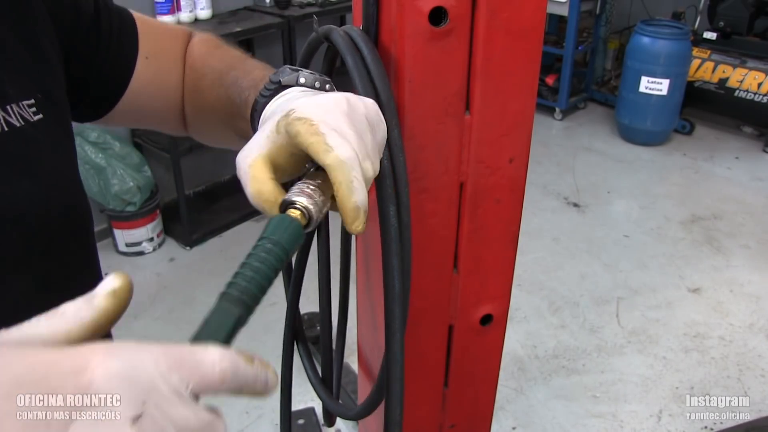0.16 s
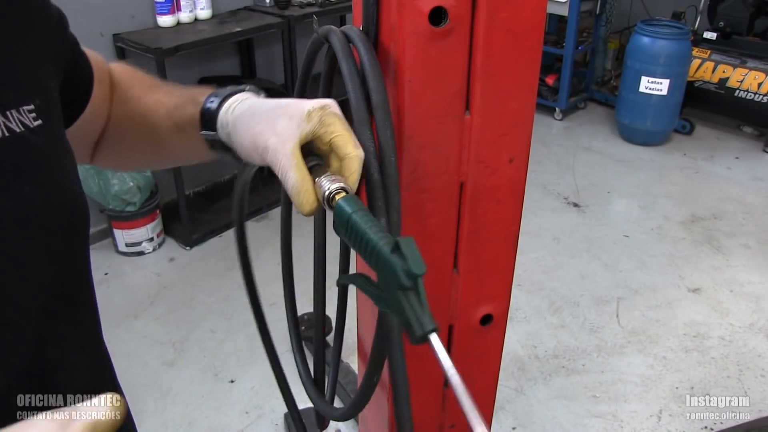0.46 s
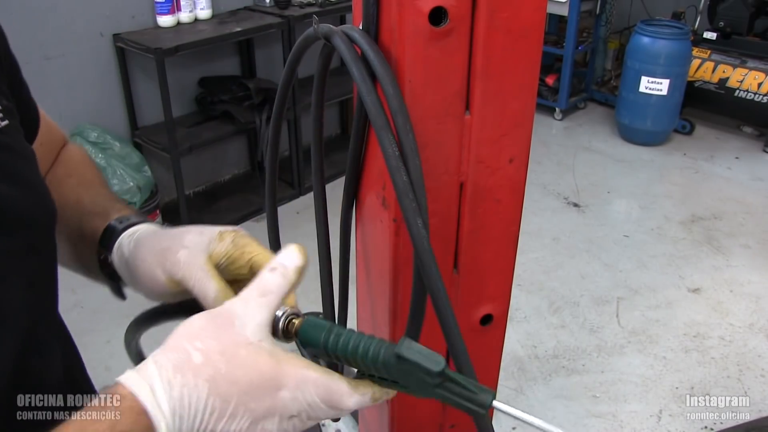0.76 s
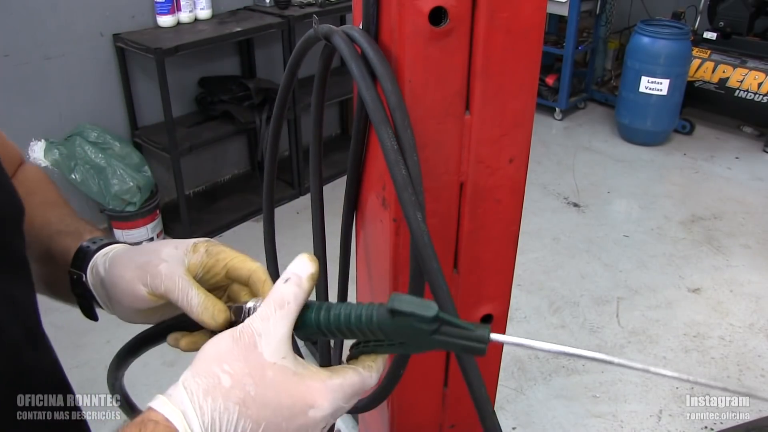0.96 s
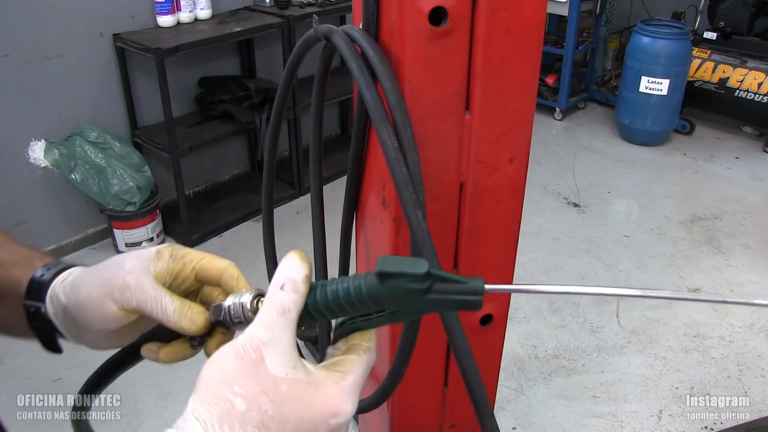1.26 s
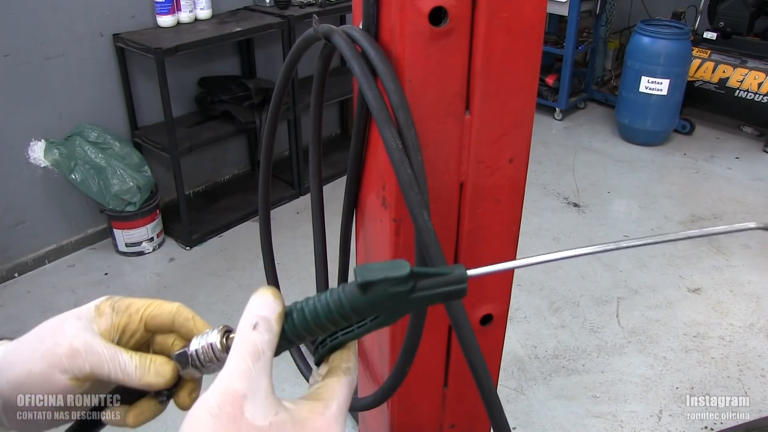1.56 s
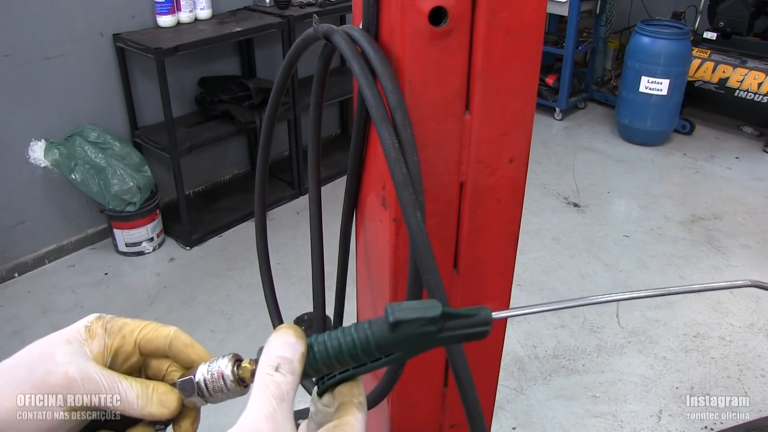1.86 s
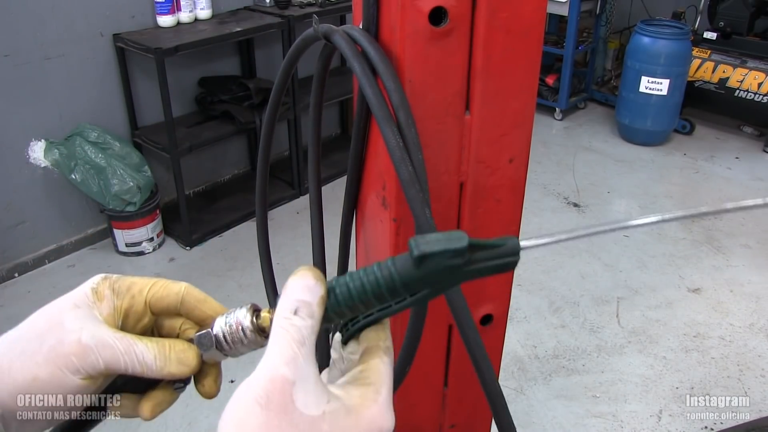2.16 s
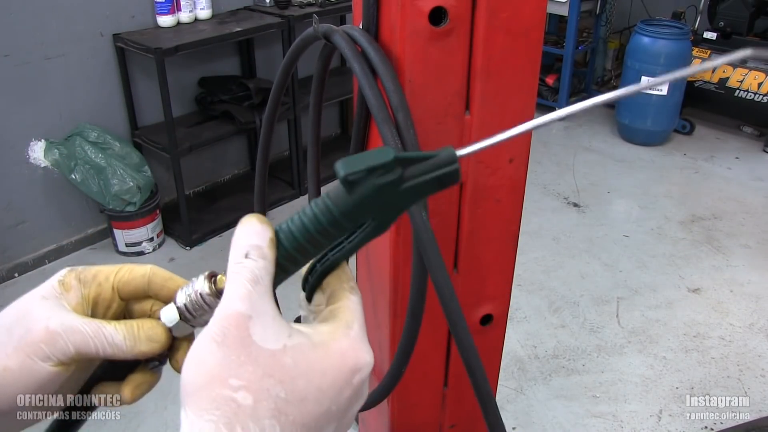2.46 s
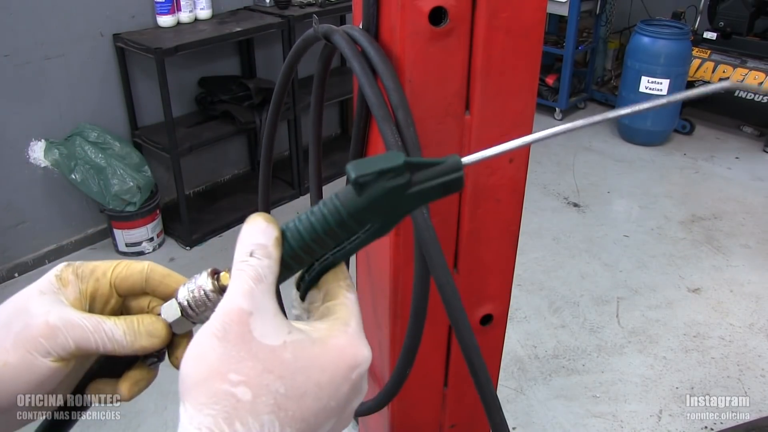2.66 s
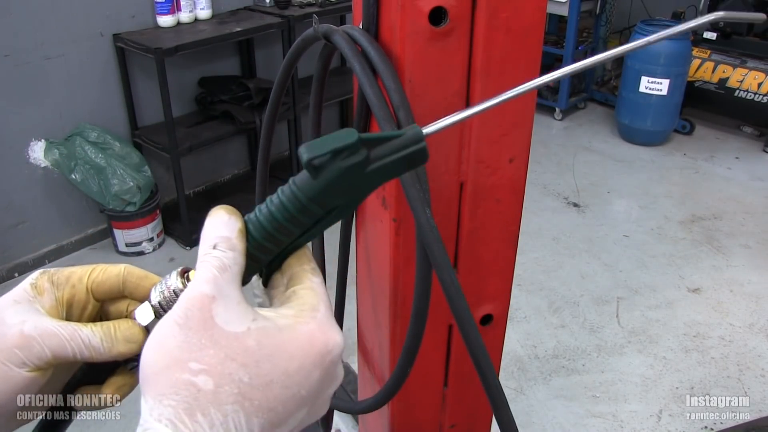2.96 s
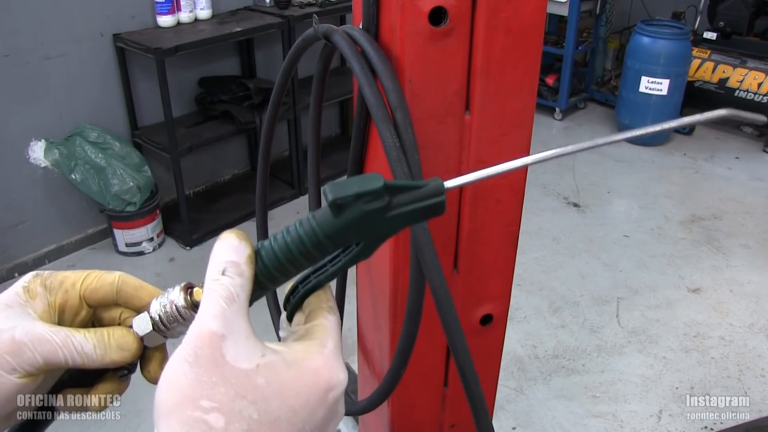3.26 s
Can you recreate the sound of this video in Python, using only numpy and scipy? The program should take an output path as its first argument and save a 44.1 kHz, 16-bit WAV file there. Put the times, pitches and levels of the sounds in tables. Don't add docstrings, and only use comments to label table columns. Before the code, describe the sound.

Air gun blasts, close and very loud, follow a second of tiny metal clicks and faint scrapes. Five hissing squeezes with dull trigger knocks echo in a big hard hall, the recorder's level ducking under each.

```python
import sys
import numpy as np
from scipy import signal
from scipy.fft import rfft, irfft
from scipy.io import wavfile
from scipy.ndimage import uniform_filter1d

SR = 44100
rng = np.random.default_rng(int(sys.argv[2]) if len(sys.argv) > 2 else 0)


def volts_from_db(level):
    exponent = np.asarray(level, float) / 20
    return 10 ** exponent


def master(y):
    cut = np.clip(np.atleast_2d(y).T, -1, 1)
    pcm = np.round(cut * 32767)
    wavfile.write(sys.argv[1], SR, pcm.astype(np.int16))


N = 149940


def evened(x):
    return x / np.sqrt(np.mean(x ** 2) + 1e-20)


def add(mix, start_s, sound):
    part = mix[round(start_s * SR):][:len(sound)]
    part += sound[:len(part)]


def read(points, hz):
    f, value = np.transpose(points)
    return np.interp(np.log(hz + 1), np.log(f + 1), value)


def colour(x, table):
    gain = volts_from_db(read(table, np.fft.rfftfreq(x.shape[-1], 1 / SR)))
    return irfft(rfft(x) * gain, x.shape[-1])


def resonate(x, hz, width_hz):
    turn = np.exp(2j * np.pi * np.cumsum(hz * np.ones(len(x))) / SR)
    r = np.exp(-np.pi * width_hz / SR)
    return 2 * (turn * signal.lfilter([1 - r], [1, -r], x / turn)).real


def wander(size):
    return evened(uniform_filter1d(uniform_filter1d(rng.standard_normal(N), size), size))


# pitch_hz, likeness [0-1]
LIKENESS = [(60, 0.91), (180, 0.87), (550, 0.73), (1650, 0.54), (4970, 0.57), (15000, 0.76)]


def diffuse(level_db):
    frames, hz = N // 128 + 5, np.fft.rfftfreq(512, 1 / SR)
    a, b, c, d = rng.standard_normal((frames, 257, 4)).T
    same = np.clip(read(LIKENESS, hz), 0, 1)[:, None]
    left = a + 1j * b
    right = same * left + np.sqrt(1 - same ** 2) * (c + 1j * d)
    level = volts_from_db(level_db(hz[:, None], np.arange(frames) * 128 / SR))
    spectra = np.array([left, right]) * level
    return signal.istft(spectra, nperseg=512, noverlap=384)[1][:, :N]


# pitch_hz, slope-free level_db
JET_COLOUR = [(150, -55), (650, -21), (1400, -17), (2500, -14.5), (6000, -10), (8500, -8), (11300, -4.5),
              (16000, -4.5)]


def jet_hiss():
    crackling = rng.standard_normal(N) * volts_from_db(1 * wander(size=12))
    return evened(colour(crackling, JET_COLOUR)) * volts_from_db(1.22 * wander(size=250))


def tube_whoosh(raw, u):
    low_hz, high_hz, fill_s = 1670, 6500, 0.077
    hz = low_hz + (high_hz - low_hz) * np.clip(u / fill_s, 0, 1)
    return evened(resonate(raw, hz, width_hz=1900)) * volts_from_db(-15.5)


def tip_whistle(raw, start_s):
    fade_db_per_s = -7.5
    return evened(resonate(raw, 11260, width_hz=4350)) * volts_from_db(-5 + fade_db_per_s * (start_s - 1))


# start_s, length_s, level_db, sag_db_per_s
SQUEEZES = [
    (1.108, 0.095, 0, -65),
    (1.342, .1, -1.5, -18),
    (1.977, 0.1278, 4, 5),
    (2.348, 0.14, 5, -12),
    (2.691, 0.43, 6, -24),
]


def jets():
    leak_s, leak_db, open_s, close_s = 0.016, -21, 0.029, 0.047
    out, hiss, raw = np.zeros(N), jet_hiss(), rng.standard_normal(N)
    for start_s, length_s, level_db, sag_db_per_s in SQUEEZES:
        u = np.arange(-leak_s, length_s + close_s, 1 / SR)
        first = round((start_s - leak_s) * SR)
        at = slice(first, first + len(u))
        opening = np.clip(u / open_s, 0, 1)
        closing = np.clip((length_s - u) / close_s + 0.5, 0, 1)
        flow = opening * closing * volts_from_db(sag_db_per_s * u)
        leak = volts_from_db(leak_db) * (u < open_s) * np.clip(u / leak_s + 1, 0, 1) ** 2
        tube = tube_whoosh(raw[at], u) + tip_whistle(raw[at][::-1], start_s)
        out[at] += volts_from_db(level_db) * ((flow + leak) * hiss[at] + flow * tube)
    return out


# start_s, peak_db, pitch_hz, width_hz
COUPLER_CLICKS = [(0.0216, -21.5, 5350, 500), (0.03, -33, 5800, 900), (0.0432, -20, 2940, 500),
                  (0.0446, -29, 4600, 500), (.0432, -26, 7200, 900), (.1386, -31, 7350, 3000),
                  (.139, -45, 14000, 2500), (.246, -37, 13000, 2000), (0.511, -32, 7500, 4000),
                  (.516, -31, 3880, 900), (0.599, -44, 12000, 3000), (0.616, -32, 9100, 5000),
                  (0.637, -31, 13000, 2500), (.644, -28, 7850, 2500), (0.6857, -39, 4400, 900),
                  (.785, -42, 2300, 710), (.816, -33, 11900, 6050), (.822, -36, 5000, 4000)]


def coupler_clicks():
    out, t = np.zeros(N), np.arange(4000) / SR
    for start_s, peak_db, hz, width_hz in COUPLER_CLICKS:
        tick = resonate(rng.standard_normal(4000) * np.exp(-t / 0.0013), hz, width_hz)
        add(out, start_s, volts_from_db(peak_db - 3.5) * tick / abs(tick).max())
    return out


# start_s, level_db, pitch_hz, t60_s
KNOCKS = [
    (1.102, -22.5, 141, 0.053),
    (1.1002, -22.5, 410, 0.018),
    (1.219, -25.5, 200, 0.068),
    (1.335, -22, 152, 0.023),
    (1.464, -25, 192, 0.069),
    (1.966, -29.5, 87, 0.082),
    (2.357, -17.5, 327, .05),
    (2.662, -24, 270, 0.062),
    (2.662, -42, 119, 0.086),
]


def trigger_knocks():
    out, t = np.zeros(N), np.arange(4000) / SR
    for start_s, level_db, hz, t60_s in KNOCKS:
        add(out, start_s, volts_from_db(level_db - 60 * t / t60_s) * np.sin(2 * np.pi * hz * t))
    return out


# pitch_hz, t60_s
HALL_T60 = [(300, 2.0), (1200, 2.8), (3000, 2.3), (7000, 1.45), (11000, .88), (13500, .68), (16000, .42)]
# pitch_hz, level_db
HALL_COLOUR = [(300, -17), (1200, -3), (3000, 0.5), (7000, 2), (12000, -2), (16000, -4.5)]


def hall(x):
    gap_s, wet_db, nearby_db, nearby_t60_s = 0.011, -59, 10.5, 0.084

    def fall_db(hz, s):
        t60_s = read(HALL_T60, hz)
        late = volts_from_db(read(HALL_COLOUR, hz) - 60 * s / t60_s) ** 2 / t60_s
        nearby = volts_from_db(nearby_db - 60 * np.minimum(s, 1) / nearby_t60_s) ** 2
        return 10 * np.log10(late + nearby)

    rise = np.clip(np.arange(N) / SR / gap_s, 0, 1) ** 2
    tail = diffuse(fall_db) * rise * volts_from_db(wet_db)
    return signal.fftconvolve(x[None], tail, axes=1)[:, :N]


def swept_hall(x):
    swing_hz = 1.7
    turn = 2 * np.pi * swing_hz * np.arange(N) / SR
    return hall(x * np.cos(turn)) + hall(x * np.sin(turn))


# start_s, length_s, level_db, pitch_hz, width_hz
FAR_SOUNDS = [
    (.18, 0.12, -36.5, 285, 59),
    (.17, 0.05, -45, 1110, 90),
    (.17, 0.13, -39, 270, 1450),
    (0.327, 0.039, -39, 222, 78),
    (0.202, 0.23, -54.5, 3700, 300),
    (0.93, 0.2, -40, 533, 64),
    (.93, 0.24, -41.5, 300, 750),
    (1.1, 0.59, -41, 62, 11),
    (2.2, 0.12, -41, 110, 18),
    (2.55, 0.33, -40, 113, 12),
]


def far_sounds():
    out, u = np.zeros(N), np.arange(SR // 2) / SR
    for start_s, length_s, level_db, hz, width_hz in FAR_SOUNDS:
        shape = np.clip(u / 0.023, 0, 1) * np.exp(-np.clip(u - length_s, 0, 9) / 0.12)
        rub = resonate(rng.standard_normal(SR // 2), hz, width_hz)
        add(out, start_s, volts_from_db(level_db) * shape * evened(resonate(rub, hz, 2 * width_hz)))
    return out


# pitch_hz, level_db
WASH_COLOUR = [(300, -10), (1500, 0), (5000, -2.5), (9000, -10), (15000, -25)]


def wash():
    t60_s = 2.2
    noise = evened(diffuse(lambda hz, s: read(WASH_COLOUR, hz) + 0 * s))
    return noise * volts_from_db(-42 - 60 * np.arange(N) / SR / t60_s)


# pitch_hz, width_hz, level_db
MACHINE_HUM = [(59.6, 6.8, -46), (115, 4.3, -54.5), (244, 11, -58)]


def hum():
    return sum(volts_from_db(level_db) * evened(resonate(rng.standard_normal(N), hz, width_hz))
               for hz, width_hz, level_db in MACHINE_HUM)


# pitch_hz, level_db
AIR_COLOUR = [(25, -26), (55, -13), (250, -1), (600, -6.5), (1100, -12.5), (2500, -22.5), (7000, -31.5),
              (16000, -42.5)]


def room_air():
    noise = diffuse(lambda hz, s: 0 * hz * s)
    return evened(colour(noise, AIR_COLOUR)) * volts_from_db(-40 + 1.2 * wander(size=3000))


def scene():
    jet, hands = jets(), coupler_clicks() + trigger_knocks()
    echoes = swept_hall(jet + volts_from_db(-41) * hands)
    return jet + hands + echoes + far_sounds() + wash() + hum() + room_air()


# pitch_hz, level_db
LEAN_COLOUR = [(60, -4), (250, -3), (1000, -2.8), (4000, -1.6), (8000, -1.1), (15000, -1.8)]
# pitch_hz, level_db
MIC_COLOUR = [(20, -13), (45, -10), (90, -1), (16000, 1.5)]


def microphones(x):
    left = colour(x[0], [(f, db / 2) for f, db in LEAN_COLOUR])
    right = colour(x[1], [(f, -db / 2) for f, db in LEAN_COLOUR])
    return colour(np.array([left, right]), MIC_COLOUR)


def gain_control(x):
    knee_db, squeeze, grab_s, let_go_db_per_s = -12, 0.86, 0.0067, 72
    deep_db, tired_s, forget_s = 6.5, 0.25, 0.33
    power = abs(uniform_filter1d((x ** 2).mean(0), size=256))[::128]
    power_db = 10 * np.log10(power + 1e-12)
    want_db = squeeze * np.maximum(power_db - knee_db, 0)
    step_s, cut_db, tired, cuts = 128 / SR, 0.0, 0.0, []
    for want in want_db:
        if want > cut_db:
            cut_db += (want - cut_db) * min(step_s / grab_s, 1)
        else:
            let_go_db = let_go_db_per_s * step_s / (1 + (tired / tired_s) ** 8)
            cut_db = max(want, cut_db - let_go_db)
        deep = min(max(cut_db - deep_db, 0), 1)
        tired += step_s * (deep - tired / forget_s)
        cuts.append(cut_db)
    return x / volts_from_db(np.interp(np.arange(N), np.arange(len(cuts)) * 128, cuts))


def band_limit(x):
    return signal.sosfilt(signal.butter(12, 16470, fs=SR, output="sos"), x)


def record(dry):
    x = np.clip(gain_control(microphones(dry)), -1, 1)
    edge = signal.firwin(511, 15800, window=("kaiser", 9), fs=SR)
    x = signal.oaconvolve(x, edge[None], "same")
    return band_limit(x)


dry = scene()
out = record(dry)
master(out)
```